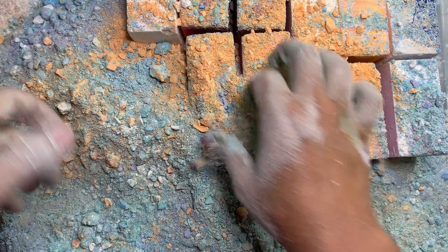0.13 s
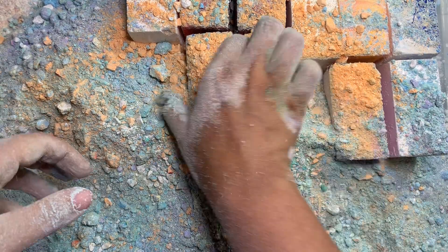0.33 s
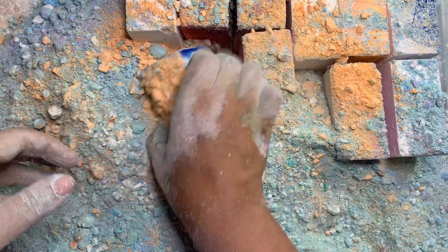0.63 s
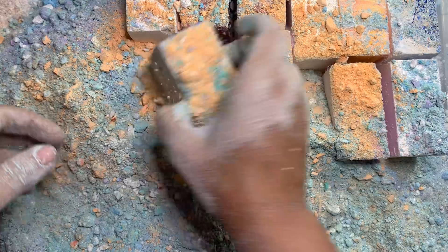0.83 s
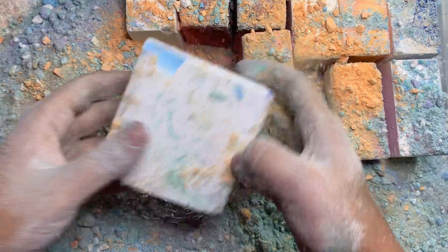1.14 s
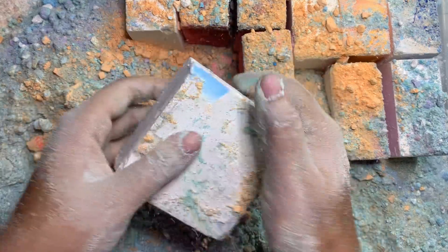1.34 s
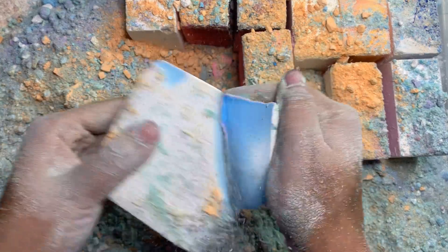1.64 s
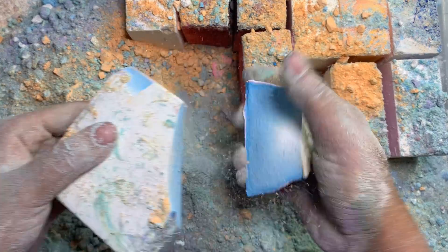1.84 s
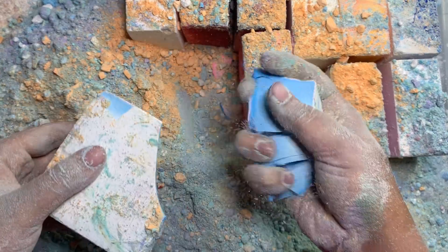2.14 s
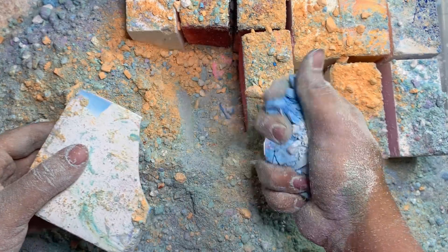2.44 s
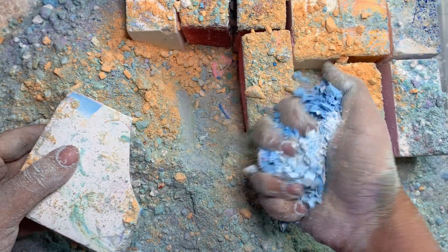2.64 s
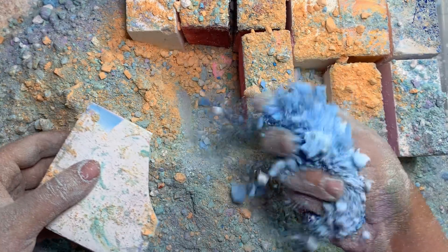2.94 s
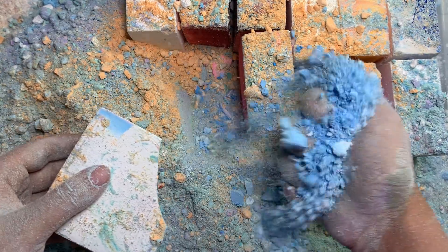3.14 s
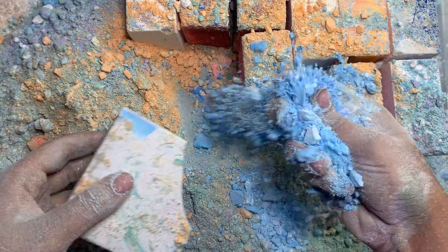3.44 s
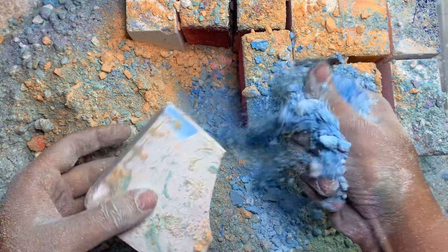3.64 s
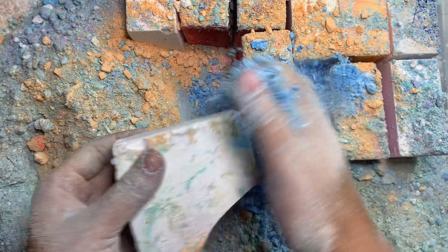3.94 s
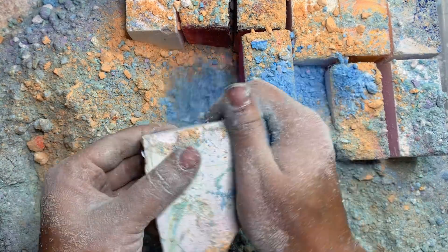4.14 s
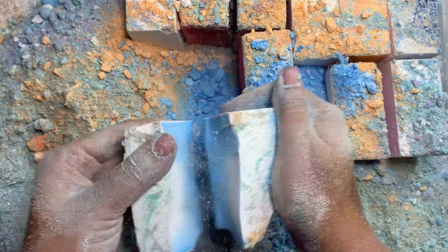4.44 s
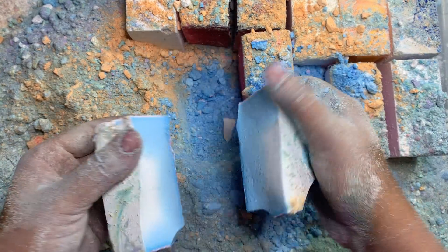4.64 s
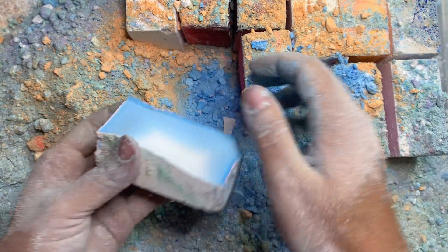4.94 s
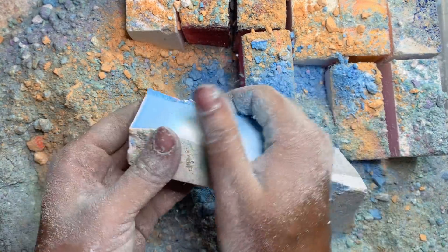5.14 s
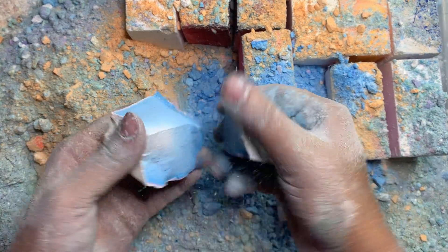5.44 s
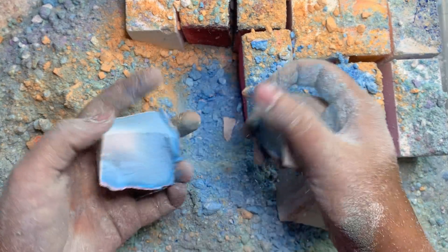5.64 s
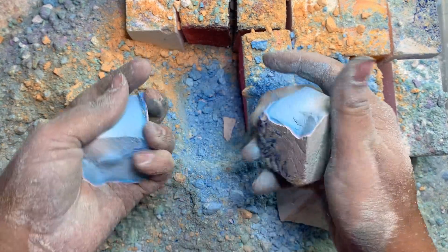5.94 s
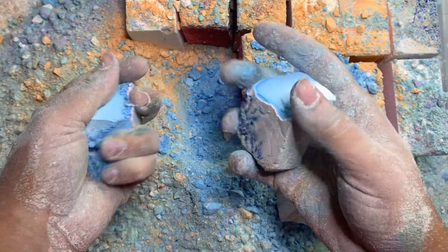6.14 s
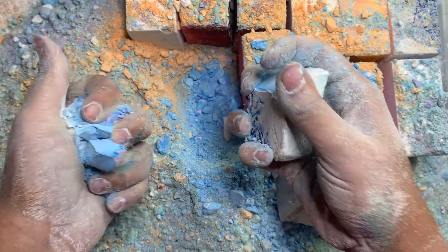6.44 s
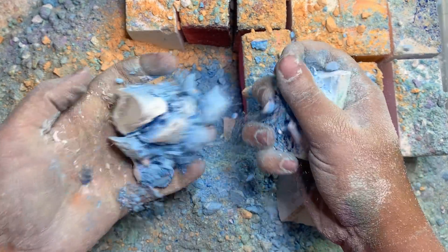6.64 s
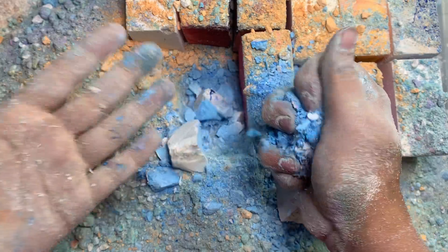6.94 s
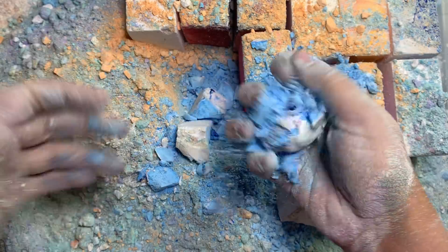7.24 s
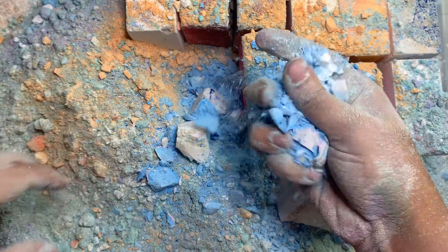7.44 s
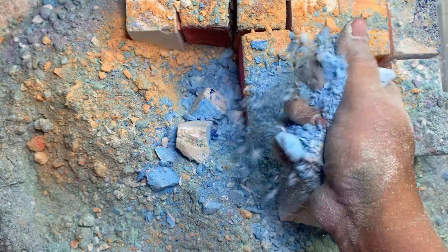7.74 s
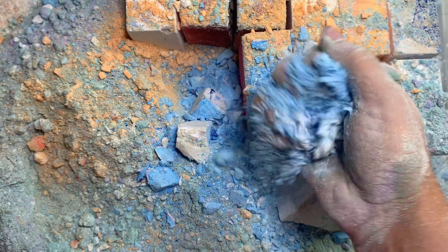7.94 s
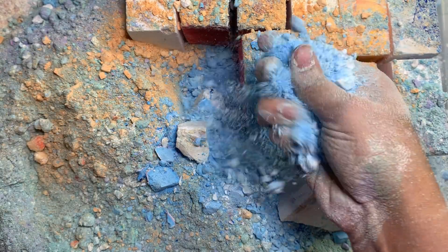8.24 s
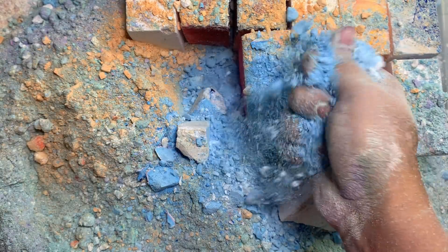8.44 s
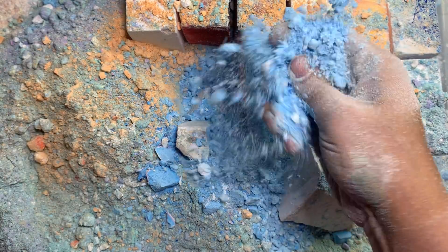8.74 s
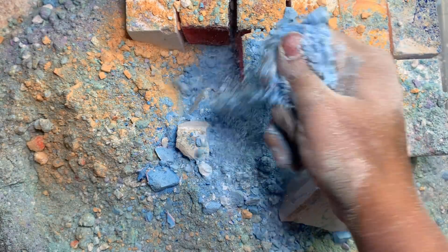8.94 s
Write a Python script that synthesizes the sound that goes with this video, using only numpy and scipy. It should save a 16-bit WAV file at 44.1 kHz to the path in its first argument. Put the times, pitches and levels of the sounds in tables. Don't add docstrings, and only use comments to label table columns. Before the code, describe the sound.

Over a soft ventilation rumble, hands rub, crack and crush brittle chalk close up, crumbs crackling and trickling between hard, woody breaks.

```python
import sys
import numpy as np
from scipy import signal
from scipy.fft import rfft, irfft, next_fast_len
from scipy.io import wavfile
from scipy.ndimage import uniform_filter1d

SR = 44100
rng = np.random.default_rng(int(sys.argv[2]) if len(sys.argv) > 2 else 0)


def undo_db(level):
    steps = np.asarray(level, float) / 20
    return 10 ** steps


def digitize_waveform(pressure):
    field = np.atleast_2d(pressure).T
    bounded = np.clip(field, -1, 1)
    quanta = np.round(bounded * 32767).astype(np.int16)
    wavfile.write(sys.argv[1], SR, quanta)


N = 400428
FAST = next_fast_len(N)


def on_log(table, hz):
    points, values = np.transpose(table)
    return np.interp(np.log(hz + 1), np.log(points), values)


def colour(x, table):
    size = next_fast_len(len(x))
    hz = np.arange(size // 2 + 1) * SR / size
    edges = np.minimum(1, (hz / table[0][0]) ** 2) * np.minimum(1, (table[-1][0] / (hz + 1)) ** 2)
    y = irfft(rfft(x, size) * undo_db(on_log(table, hz)) * edges, size)[:len(x)]
    return y / np.std(y)


def ring(x, hz, width_hz):
    b, a = signal.iirpeak(min(hz, .4 * SR), max(hz / width_hz, .3), fs=SR)
    return signal.lfilter(b, a, x)


def walk(rate):
    k = int(SR / rate)
    return 1.97 * uniform_filter1d(np.repeat(rng.standard_normal(N // k + 1), k), k)[:N]


def add(out, s, sound):
    i = int(s * SR)
    out[i:i + len(sound)] += sound[:N - i]


# pitch_hz, width_hz, level_db
HUM_MODES = [(41.2, 4, -5), (57.4, 6.5, 0), (72.7, 8.7, -5), (92.5, 7.6, -4.5), (110, 11, -7.5),
             (137, 12, 0.5), (187, 20.5, -24.5)]
# freq_hz, level_db
RUSH_COLOUR = [(200, -9.5), (310, 4.5), (470, 0.5), (620, -10), (800, -18), (1300, -25.5)]
# freq_hz, level_db
HISS_COLOUR = [(700, -2.5), (1400, -12), (3000, -16.5), (6000, -11), (7500, -23), (13500, -18),
               (14600, -21), (15200, -61)]
# peak_s, rush_db
GUSTS = [(.7, -58.5), (1.5, -58.5), (2.3, -62.5), (3.098, -62), (3.95, -62), (4.5, -58), (5.35, -64.5),
         (6.1, -62), (6.9, -59), (7.45, -61.5), (8.2, -72)]
GUST_SPREAD_S, CALM_DB = 0.31, -66.5
HUM_DB, HUM_SAG_DB_S, HISS_DB = -51, -0.18, -79
RUSH_BRIGHTENS = 1


def ventilation():
    t = np.arange(N) / SR
    gusts = sum(undo_db(2 * db) * np.exp(-((t - s) / GUST_SPREAD_S) ** 2) for s, db in GUSTS)
    rush_db = 10 * np.log10(undo_db(2 * CALM_DB) + gusts)

    hum = np.zeros(N)
    for hz, width_hz, db in HUM_MODES:
        wide = 1.75 * width_hz
        hum += undo_db(db) * ring(ring(rng.standard_normal(N), hz, wide), hz, wide)
    motor = np.sin(2 * np.pi * 59.2 * t + 1.06 * walk(3.17))
    hum = colour(hum, [(26, -15.0), (38, -1.5), (400, -0.5)]) + undo_db(-4.5) * motor

    rush = colour(rng.standard_normal(N), RUSH_COLOUR) * undo_db(1.2 * walk(6))
    rush = rush + ring(rush, 551, 115) * undo_db(RUSH_BRIGHTENS * (rush_db + 63.5))
    hiss = colour(rng.standard_normal(N), HISS_COLOUR) * undo_db(HISS_DB)
    return hum * undo_db(HUM_DB + HUM_SAG_DB_S * t + 1.0) + rush * undo_db(rush_db - 1.0) + hiss


def ticks(per_s, spread_db):
    strength = undo_db(spread_db * np.minimum(rng.exponential(size=N), 4))
    return (rng.random(N) < per_s / SR) * strength * rng.standard_normal(N)


def grit(rate, spread_db, smooth, patchy_db):
    out = np.zeros(N)
    for hz in 900 * 2 ** np.arange(0, 4.2, .7):
        out += ring(ticks(rate, spread_db), hz, 0.42 * hz) / np.sqrt(hz)
    edge = np.diff(out, prepend=0)
    out = edge / np.std(edge) + out / np.std(out)
    sharp = ticks(rate / 4, spread_db)
    grains = out / np.std(out) + 0.2 * sharp / np.std(sharp)
    return (grains + smooth * rng.standard_normal(N)) * undo_db(patchy_db * walk(30))


SQUEEZE_ATTACK_S, SQUEEZE_RELEASE_DB_S = 0.038, 148


def squeeze(s, hold):
    t = np.arange(N) / SR - s
    return np.clip(t / SQUEEZE_ATTACK_S + 1, 0, 1) * undo_db(-SQUEEZE_RELEASE_DB_S * np.clip(t - hold, 0, 1))


# freq_hz, level_db
CRUMB_COLOUR = [(500, -15), (900, -3.5), (1400, -1.5), (2000, -0.5), (2800, -4.5), (4000, -2),
                (6000, -21.5)]
# freq_hz, level_db
GRIT_COLOUR = [(2500, -7), (3600, -8), (5500, -2.5), (8000, -9.5), (11000, -13), (15000, -18.5)]
# start_s, hold_s, crumbs_db, fine_grit_db relative to the crumbs
SQUEEZES = [(0, 0.024, -66.5, 1.5), (0.767, 0.056, -67, -10), (0.993, 0.5, -81, 5.5),
            (1.893, 0.23, -85, 15.5), (2.123, 0.42, -53, -3), (2.663, 0.46, -59, -9.5),
            (2.994, 0.074, -64.5, 2), (3.204, 0.2, -60.5, -13.5), (3.495, .36, -63, -1.5),
            (3.954, 0.16, -70.5, 0.5), (4.413, 0.47, -74, -0.5), (5.103, 0.16, -73.5, 7.5),
            (5.266, 0.032, -60, 0.5), (5.4, 1, -70.5, -1.5), (5.933, 0.47, -67.5, 3.5),
            (6.455, 0.16, -65, 4), (6.708, 0.31, -65, 0.5), (7.09, 0.12, -66, -11), (7.23, 0.062, -64, -3),
            (7.376, 0.058, -55.5, -4), (7.523, 0.037, -58, -7), (7.642, 0.12, -59.5, -2),
            (7.947, 0.054, -57, -12), (8.17, 0.18, -59, -7), (8.387, 0.59, -67.5, -6),
            (8.7, 0.14, -63, -18), (8.906, 0.15, -66.5, -1)]
TRICKLE_DB = -86


def hands():
    crumbs = colour(grit(520, spread_db=3.7, smooth=.75, patchy_db=1.2), CRUMB_COLOUR)
    fine = colour(grit(450, spread_db=3.4, smooth=1.1, patchy_db=1.8), GRIT_COLOUR)
    coarse_power = fine_power = undo_db(2 * TRICKLE_DB)
    for s, hold, level_db, grit_db in SQUEEZES:
        power = (squeeze(s, hold) * undo_db(level_db)) ** 2
        coarse_power = coarse_power + power
        fine_power = fine_power + power * undo_db(2 * grit_db)
    return crumbs * np.sqrt(coarse_power) + fine * np.sqrt(fine_power)


# start_s, length_s, level_db, modes_centre_hz, dust_db relative
RUBS = [(0, 0.044, -64.5, 3200, -3), (0.297, 0.054, -69, 4500, -26), (.07, 0.02, -74, 6000, -6),
        (.53, 0.16, -64.5, 1240, -30), (.585, 0.1, -69.5, 6100, -15), (.77, 0.13, -69.5, 5400, -18),
        (0.94, 0.64, -73.5, 2600, -27), (0.99, 0.17, -68, 4300, -11), (1.148, 0.046, -56, 3900, -10),
        (1.223, 0.077, -61, 5200, -14), (1.362, 0.062, -66.5, 3480, -4.5), (1.74, 0.043, -78.5, 6000, 1),
        (1.785, 0.035, -74, 4300, 4), (1.85, 0.025, -70, 6500, -6), (1.91, 0.05, -61.5, 6300, -15),
        (1.957, 0.035, -52, 3700, -11), (2.015, 0.038, -61, 5000, -8), (3.942, 0.12, -70, 3700, -11),
        (4.081, 0.085, -71, 5200, -16), (4.548, 0.038, -77, 4100, 2), (4.612, 0.22, -70.5, 5600, 1.5),
        (4.79, 0.038, -53, 5000, -11), (4.81, 0.06, -64, 4400, -13), (4.876, 0.027, -65.5, 4500, 0.5),
        (4.993, .015, -68, 5600, -8), (5.067, 0.085, -58, 6100, -6), (5.147, 0.047, -77, 6200, 8)]
# start_s, length_s, level_db, modes_centre_hz
SHIFTS = [(1.43, 0.025, -72.5, 5000), (2.755, 0.035, -69, 5000), (5.394, 0.066, -67.5, 6300),
          (5.497, 0.033, -63, 4600), (5.637, 0.066, -68, 4720), (5.689, 0.051, -68, 5730),
          (5.754, 0.049, -62, 5900), (5.844, 0.073, -66, 5470), (5.916, 0.051, -64.5, 4830)]
# pitch_hz, width_hz, level_db
RUB_MODES = [(980, 230, 13), (1550, 75, 8), (2270, 21, -0.5), (2526, 37, 1), (2990, 51, 2), (3700, 60, 6.5),
             (3950, 96, -4), (4500, 190, 1), (5200, 97, 12), (6100, 120, 6), (6850, 280, -5)]
# freq_hz, level_db
DUST_COLOUR = [(5000, -15), (8000, -18.5), (11000, -16.5), (14000, -18), (16000, -30.5)]
SHIFT_DUST_DB = 0.5
RUB_BLUR = 2.5
RUB_HISS, HISS_PER_DUST = .4, .3


def rubs():
    out = np.zeros(N)
    strokes = list(RUBS) + [(*row, SHIFT_DUST_DB) for row in SHIFTS]
    noise = rng.standard_normal((len(strokes), 16384))
    grips = rng.standard_normal((len(strokes), len(RUB_MODES)))
    for (s, length, level_db, hz, dust_db), slide, grip in zip(strokes, noise, grips):
        part = np.arange(len(slide)) / SR / length
        stroke = np.clip(np.minimum(part / 0.2, (1.15 - part) / 0.63), 0, 1)
        modes = np.zeros(len(slide))
        for (f, width_hz, db), g in zip(RUB_MODES, grip):
            mode_db = db + 2.1 * g - 38 * np.log2(f / hz) ** 2
            modes += ring(slide, f, width_hz + RUB_BLUR / length) * np.sqrt(SR / width_hz) * undo_db(mode_db)
        broad = ring(ring(slide, hz, 0.9 * hz), hz, 0.9 * hz)
        swish = RUB_HISS * undo_db(HISS_PER_DUST * dust_db) * broad / np.std(broad)
        powder = undo_db(dust_db + 6.5) * colour(slide, DUST_COLOUR)
        add(out, s, undo_db(level_db) * stroke * (swish + modes / np.std(modes) + powder))
    return out


# start_s, length_s, pitch_hz, width_hz, level_db
STREAKS = [(0, 0.037, 1900, 150, -65), (.14, 0.043, 1700, 603, -67), (0.535, 0.061, 1050, 200, -65),
           (0.52, 0.14, 1550, 200, -68), (1.003, .1, 3800, 40, -75), (1.034, .08, 5830, 70, -64),
           (1.03, 0.036, 7200, 80, -67), (1.11, 0.035, 3750, 40, -64), (1.225, .06, 5350, 90, -66),
           (1.373, 0.057, 3010, 120, -63), (4.535, .05, 3950, 120, -74), (4.612, .09, 3920, 350, -62),
           (4.611, 0.26, 4500, 60, -65.5), (4.8, 0.029, 4430, 200, -46), (1, 0.36, 2526, 40, -66),
           (1.148, .04, 3640, 60, -62), (1.143, 0.053, 5670, 150, -62), (4.73, .05, 2050, 97, -72),
           (4.8, .08, 2270, 60, -64), (.585, .025, 1600, 250, -61), (.3, .1, 1150, 150, -71),
           (.75, .035, 1550, 200, -67), (.81, .06, 2300, 300, -68), (1.76, .06, 2150, 200, -72),
           (1.058, .02, 2500, 100, -60), (4.875, 0.024, 3710, 100, -58), (5.49, 0.049, 3840, 150, -68),
           (5.647, 0.032, 4630, 120, -65)]


def streaks():
    out = np.zeros(N)
    noise = rng.standard_normal((len(STREAKS), 8192))
    for (s, length, hz, width_hz, level_db), slide in zip(STREAKS, noise):
        part = np.arange(len(slide)) / SR / length
        drag = np.clip(np.minimum(part / 0.16, 1.2 - part), 0, 1)
        tone = ring(ring(slide, hz, 1.7 * width_hz), hz, 1.7 * width_hz)
        add(out, s, undo_db(level_db) * drag * tone / np.std(tone))
    return out


# start_s, peak_db, ring_hz, treble_db, crumbling_t60_s
BREAKS = [(1.5956, -23, 4300, -30, 0.17), (2.1001, -18, 2450, -38, 0.079), (2.1425, -15, 1770, -32, 0.16),
          (2.174, -19, 3300, -40, 0.04), (2.1923, -18, 3330, -54.5, 0.042),
          (2.2714, -22.5, 2200, -45, 0.045), (2.409, -20, 1510, -49, 0.031),
          (2.4633, -26.5, 1840, -46, 0.48), (2.5498, -28.5, 3970, -52, 0.042),
          (3.5066, -16, 1600, -80, 0.04), (4.3912, -14, 3260, -29, 0.11), (4.8, -30, 4450, -39.5, 0.037),
          (5.2492, -16, 4000, -31, 0.04), (6.0913, -20.5, 2150, -46, 0.05), (6.2805, -26, 1960, -49, 0.1),
          (6.503, -28.5, 800, -35, 0.18), (6.8322, -27, 2840, -43, 0.13), (6.9301, -22.5, 3820, -35, 0.11),
          (6.996, -11, 3400, -39, 0.023), (7.0394, -24, 1750, -44, 0.1), (7.5535, -27, 3500, -45, 0.1),
          (7.639, -18.5, 2180, -36.5, 0.029), (8.2467, -26.5, 1250, -43, 0.046),
          (8.2932, -26, 1290, -36, 0.22)]
# start_s, peak_db, ring_hz, treble_db
SPLINTERS = [(2.105, -20, 1900, -53), (2.1775, -15, 1750, -40), (2.1805, -18, 2800, -44),
             (2.187, -23, 1700, -50), (2.1395, -24, 1700, -50), (2.224, -30, 3430, -46),
             (2.2628, -26.5, 1920, -39), (2.2888, -26, 1350, -49), (2.3064, -31.5, 2130, -47),
             (2.3207, -30, 1390, -45), (2.3922, -25, 2020, -47), (2.4504, -27, 1910, -50),
             (6.0667, -35, 6400, -46), (6.1544, -29, 1960, -48), (6.2432, -34.5, 2390, -35.5),
             (6.336, -34.5, 6600, -46), (6.445, -38, 2050, -41), (6.4885, -41, 1850, -45),
             (6.528, -34, 1028, -38.5), (6.5362, -40, 4270, -49), (6.6978, -38, 5530, -57),
             (6.7805, -23, 2640, -78), (6.9012, -44, 1750, -45), (6.945, -25.5, 2000, -44),
             (6.96, -43, 1580, -52), (7.3821, -31, 2110, -51), (7.417, -32, 1790, -52),
             (7.434, -27.5, 1970, -62), (7.6683, -31.5, 1350, -56), (8.2131, -28.5, 1990, -63),
             (8.2618, -32, 4670, -56), (8.2716, -43, 1360, -46), (8.9048, -36.5, 1490, -55),
             (1.586, -56, 4000, -60), (4.3805, -43, 2200, -64), (6.989, -40, 1500, -58),
             (4.8015, -41, 6300, -50), (6.509, -32, 900, -52), (6.521, -35, 3500, -56),
             (2.09, -54, 2000, -80)]
# start_s, peak_db, ring_hz
LUMPS = [(2.836, -34.5, 1690), (3.189, -39.5, 1500), (3.3457, -42, 1300), (3.369, -35.5, 1620),
         (3.501, -25, 2560), (3.6619, -34.5, 1620), (5.92, -37.5, 2060), (6.5138, -35.5, 3280),
         (6.7173, -37.5, 1720), (6.8112, -36, 2040), (7.2567, -37, 2100), (7.4447, -34, 1550),
         (7.811, -38.5, 1460), (7.84, -34.5, 1960), (7.941, -41.5, 1890), (8.162, -42, 2250),
         (8.23, -55, 1380), (8.8132, -36, 2090)]
# start_s, peak_db, ring_hz
CHIPS = [(0.2934, -55, 1530), (1.063, -44.5, 3600), (3.927, -63, 2050), (1.158, -41, 3600),
         (1.2011, -44.5, 5800), (1.339, -46, 3600), (2.3501, -38, 1320), (4.3301, -46.5, 3520),
         (5.081, -57, 6030), (6.028, -42, 4020), (6.4677, -54, 2280), (6.859, -43, 2130),
         (7.3672, -59, 1820), (7.5378, -45, 1280), (8.546, -52, 4000)]
# start_s, peak_db, ring_hz
CRUMBS = [(2.597, -42, 4010), (2.756, -38, 1310), (2.808, -43, 1970), (2.8973, -44, 1620),
          (2.92, -43.5, 1370), (2.9325, -41, 1530), (2.9676, -48, 2130), (3.0365, -38, 2270),
          (3.057, -45, 1600), (3.0872, -37, 1260), (3.1273, -49, 3520), (3.1645, -41, 1590),
          (3.5374, -37, 3500), (3.8634, -41, 1090), (4.0692, -58, 1050), (4.0971, -39.5, 980),
          (4.141, -49, 1720), (6.5815, -44, 2200), (6.7426, -46, 1000), (6.84, -38, 2620),
          (7.087, -41, 1900), (7.213, -47, 2220), (7.227, -42, 1940), (7.3237, -46, 1880),
          (7.4086, -37, 1810), (7.696, -36, 1290), (7.7514, -54, 1340), (7.7872, -43, 1110),
          (8.019, -36.5, 1820), (8.0626, -46, 1310), (8.1888, -53, 2060), (8.3614, -49, 1180),
          (8.4883, -43, 1200), (8.5766, -47, 1860), (8.6218, -46, 1070), (8.6936, -44, 1950),
          (8.768, -52, 2010), (8.778, -41, 2040), (8.974, -47, 1500), (3.515, -28, 1600),
          (7.5495, -40, 2000), (7.5035, -42, 2200), (6.2725, -34, 2200), (6.207, -41, 2000),
          (6.149, -39, 1900), (2.769, -43, 3500), (2.8585, -42, 1500), (2.7624, -43, 1310),
          (3.03, -43, 1170), (3.3186, -47, 1270), (8.5937, -49, 3640), (8.6, -50, 1700), (8.832, -45, 1500),
          (3.62, -49, 1230), (6.561, -44, 1000)]
# start_s, peak_db, ring_hz
FLAKES = [(0.5916, -55, 5900), (0.6494, -48, 6370), (2.0383, -44, 6010), (2.7082, -47.5, 5870),
          (2.7626, -49, 6990), (2.9836, -49, 6420), (3.0001, -45.5, 5920), (3.0165, -41, 6700),
          (3.9539, -50, 6280), (3.9908, -44.5, 6810), (5.9948, -49, 6220), (7.7393, -42, 6520),
          (7.9927, -44, 6360), (8.8448, -48, 7250)]
LUMP_TREBLE_DB, CHIP_TREBLE_DB, CRUMB_TREBLE_DB, FLAKE_TREBLE_DB = -33, -4, -42, -9
CRUMB_T60_S, FLAKE_T60_S = 0.057, .02
CRUMBLE_T60_S, CRUMBLE_SLOPE = 0.23, -0.33


def fractures():
    small = list(SPLINTERS)
    small += [(s, db, hz, db + LUMP_TREBLE_DB) for s, db, hz in LUMPS]
    small += [(s, db, hz, db + CHIP_TREBLE_DB) for s, db, hz in CHIPS]
    small = [(*row, CRUMBLE_T60_S * (row[2] / 2000) ** CRUMBLE_SLOPE) for row in small]
    tiny = [(s, db, hz, db + CRUMB_TREBLE_DB, CRUMB_T60_S) for s, db, hz in CRUMBS]
    tiny += [(s, db, hz, db + FLAKE_TREBLE_DB, FLAKE_T60_S) for s, db, hz in FLAKES]
    return list(BREAKS) + small + tiny


# freq_hz, level_db
CRACK_COLOUR = [(500, -3), (900, -7.5), (1400, 0), (2000, 0), (3000, 1), (4000, -0.5), (5800, -4.5),
                (8000, -19)]


def cracks():
    out, t = np.zeros(N), np.arange(4096) / SR - .012
    events = fractures()
    noise = rng.standard_normal((len(events), 2, len(t)))
    snap = np.where(t > 0, np.exp(-t / 0.0015), np.exp(t / 0.0008))
    click = 9.5 * (np.abs(t) == np.abs(t).min())
    for (s, peak_db, hz, treble_db, t60), (tear, chance) in zip(events, noise):
        slips = undo_db(4.2 * uniform_filter1d(chance, size=24) * np.sqrt(24))
        crumble = np.where(t > 0, undo_db(-60 * t / np.clip(t60, .008, .25)), np.exp(t / 0.0032))
        burst = tear * (snap + undo_db(-13.5) * slips * crumble) + click
        body = colour(burst, CRACK_COLOUR)
        shard = ring(body * undo_db(-60 * np.clip(t, 0, 1) / 0.051), hz, 0.2 * hz + 300)
        body = 0.73 * body + 1.67 * shard
        treble = colour(burst * undo_db(-60 * t / 0.14), DUST_COLOUR)
        body = undo_db(peak_db + 0.2) * body / np.abs(body).max()
        treble = undo_db(treble_db + 12) * treble / np.abs(treble).max()
        add(out, s - .0105, body + treble)
    return out


# start_s, peak_db, upper_mode_db relative
THUMPS = [(0.649, -42.5, -34), (1.598, -23, -61), (2.101, -31, -23.5), (2.142, -27, 8), (2.178, -31, -15),
          (2.267, -37, -15), (4.393, -15, -19), (5.251, -20.5, 1), (6.091, -38, -4), (6.25, -38.5, 0.5),
          (6.501, -38.5, 9.5), (6.528, -33, -29), (6.773, -43.5, 1), (6.813, -38.5, 0), (7.04, -42, 10),
          (7.641, -39.5, -7), (8.297, -42, 5)]
# pitch_hz, level_db, t60_s
BLOCK_MODES = [(340, -3.5, 0.1), (417, 1, 0.031), (554, -17.5, 0.14), (900, 2.5, 0.0084)]


def thumps():
    out, t = np.zeros(N), np.arange(4096) / SR
    detune = rng.standard_normal((len(THUMPS), len(BLOCK_MODES)))
    for (s, peak_db, upper_db), shifts in zip(THUMPS, detune):
        modes = []
        for (hz, db, t60), shift in zip(BLOCK_MODES, shifts):
            modes.append(undo_db(db - 60 * t / t60) * np.sin(2 * np.pi * hz * (1 + 0.041 * shift) * t))
        add(out, s + 0.00181, -undo_db(peak_db - 5.5) * (sum(modes[:-1]) + undo_db(upper_db) * modes[-1]))
    return out


# start_s, peak_db, pitch_hz
KNOCKS = [
    (0.65, -13.5, 145),
    (1.598, -13, 112),
    (4.393, -12.5, 115),
    (5.251, -18, 134),
    (6.809, -26, 143),
]


def knocks():
    out, t = np.zeros(N), np.arange(8192) / SR
    for s, peak_db, hz in KNOCKS:
        phase = 2 * np.pi * hz * t
        boom = np.sin(phase) + 0.19 * np.sin(1.6 * phase) + 0.53 * np.sin(2.62 * phase)
        add(out, s, undo_db(peak_db - 9.5 - 60 * t / 0.048) * np.minimum(t / 0.0057, 1) * boom)
    return out


# freq_hz, share_0_to_1
SCATTERED = [(60, 0.012), (130, .08), (250, .04), (600, 0.38), (1100, 0.1), (2800, .12), (5100, 0.22),
             (7500, .07), (9000, .005), (10400, .005), (13000, .08)]
SHARP_SCATTER, LOW_SCATTER = 0.55, .2
ROOM_T60_S, ROOM_DB, SCATTER_T60_S = .17, -16, .09


def scene():
    t = np.arange(int(.3 * SR)) / SR
    tail = rng.standard_normal(len(t)) * undo_db(-60 * t / ROOM_T60_S) * (t > .003)
    paths = rng.standard_normal(len(t)) * undo_db(-60 * t / SCATTER_T60_S)
    sharp, lows = cracks(), thumps() + knocks()
    near = sharp + lows + hands() + rubs() + streaks()
    room = undo_db(ROOM_DB) * signal.fftconvolve(near, tail / np.linalg.norm(tail))[:N]
    mono = near + room + ventilation()

    share = np.clip(on_log(SCATTERED, np.arange(FAST // 2 + 1) * SR / FAST), 0, .5)
    diffuse = mono - (1 - SHARP_SCATTER) * sharp - (1 - LOW_SCATTER) * lows
    scattered = rfft(diffuse, FAST) * rfft(paths / np.linalg.norm(paths), FAST)
    direct = rfft(mono, FAST) * np.sqrt(1 - share)
    return irfft(direct + np.sqrt(share) * scattered * np.array([[1], [-1]]), FAST)[:, :N]


def roll_off(x):
    return signal.sosfilt(signal.butter(12, 16510, fs=SR, output="sos"), x)


# freq_hz, lag_rad
PORT_LAG = [(0, 0), (350, -.25), (750, 1.1), (1250, 0), (2150, .8), (3000, 1.9), (3700, 1.4), (4300, 1.7),
            (6400, 5.9), (9800, 9.42), (15100, 15.7), (17000, 16)]
# freq_hz, lag_rad
PORT_LAG_NEAR = [(0, 0), (350, -.25), (750, 1.1), (1250, 0), (2150, .8), (2850, 3.14), (3500, 1.8),
                 (4300, 1.3), (6400, 5.9), (9800, 9.42), (15100, 15.7), (17000, 16)]
# freq_hz, level_db
PORT_BALANCE = [(35, -1), (60, -2.7), (130, -4.5), (330, -.5), (700, -2.5), (2400, -2), (5500, 0)]
# start_s, end_s
NEAR_SPANS = [(4.6, 4.8), (4.81, 4.9), (5.36, 6.02)]
MOVE_S, TOP_HZ = .02, 16350


def record(dry):
    hz, t = np.arange(FAST // 2 + 1) * SR / FAST, np.arange(N) / SR
    spectrum = rfft(dry, FAST) / np.sqrt(1 + (hz / TOP_HZ) ** 160)
    balance = undo_db(on_log(PORT_BALANCE, hz) / 2)

    def at_ports(lag):
        half = balance * np.exp(.5j * np.interp(hz, *np.transpose(lag)))
        return irfft(spectrum * np.array([half, 1 / half]), FAST)[:, :N]

    far, near = at_ports(PORT_LAG), at_ports(PORT_LAG_NEAR)
    moved = sum(np.clip(np.minimum(t - start, end - t) / MOVE_S, 0, 1) for start, end in NEAR_SPANS)
    return roll_off(far + moved * (near - far))


dry = scene()
out = record(dry)
digitize_waveform(out)
```